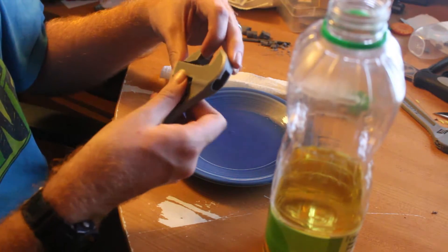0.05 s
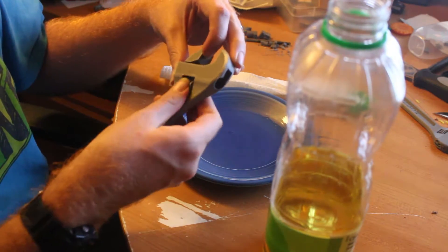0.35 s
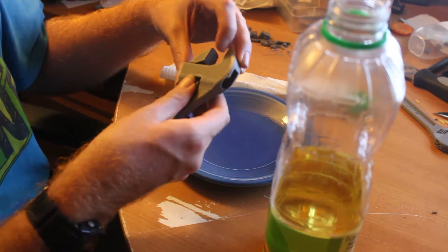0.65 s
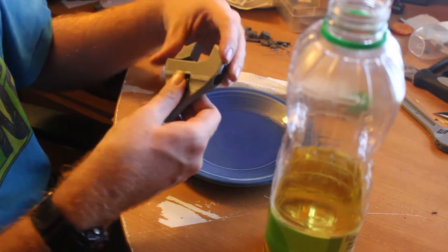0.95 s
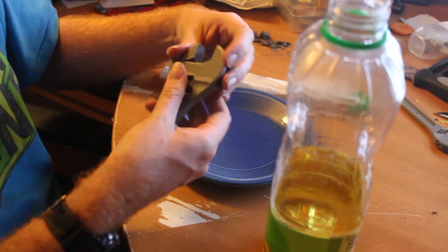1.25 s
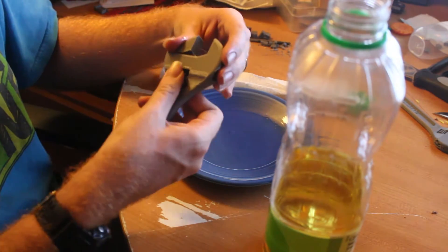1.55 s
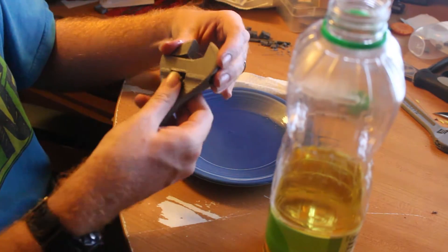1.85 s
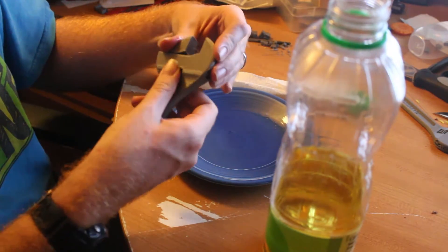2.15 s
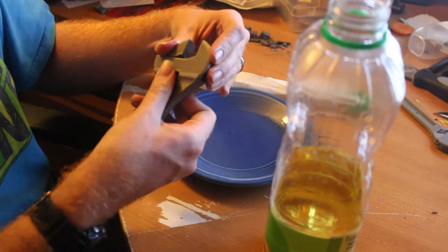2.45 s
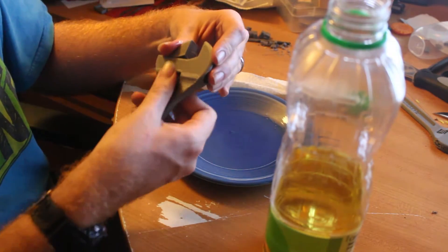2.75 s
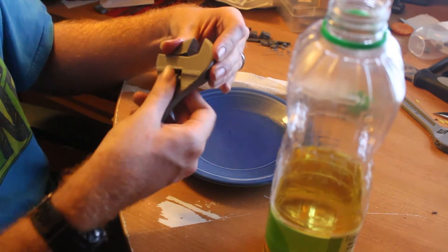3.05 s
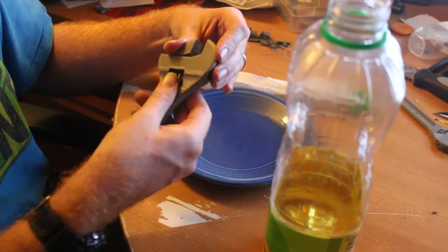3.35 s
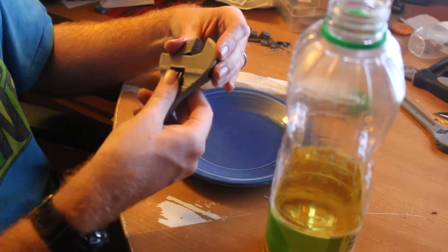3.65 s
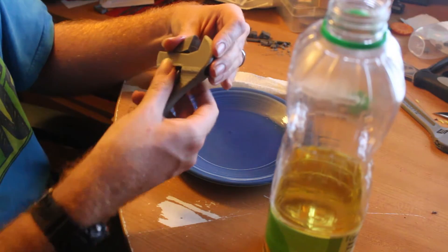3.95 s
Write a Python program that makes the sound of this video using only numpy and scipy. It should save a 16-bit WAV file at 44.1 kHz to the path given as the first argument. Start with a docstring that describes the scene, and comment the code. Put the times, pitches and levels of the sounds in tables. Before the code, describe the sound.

A small adjustable wrench clicks and rattles close by as its screw is turned. After a few faint ticks, clusters of sharp, quickly damped metal clicks come at about 1, 1.5, 2 and 2.4 seconds. They grow more frequent from 2.8 to 3.5 seconds, with a last bright cluster at 3.8. Tiny thread scrapes and faint finger rubs mix in, over soft room noise with a faint hum.

```python
"""A small adjustable wrench clicks and rattles as a thumb turns its worm screw, over a table in a quiet room.
The loose jaw knocks in its slot and the thread slips and catches; each contact force excites the modes
of the steel, which the hands damp almost at once. Fingers rub softly on the wrench head.
The table and nearby things reflect each sound, over a soft room noise with a faint hum."""
import sys
import numpy as np
from scipy import signal
from scipy.fft import rfft, irfft
from scipy.io import wavfile
from scipy.ndimage import uniform_filter1d

SR = 44100
rng = np.random.default_rng(int(sys.argv[2]) if len(sys.argv) > 2 else 0)


def waveform_to_disk(signal):
    """Save audio, clipped to [-1, 1], as 16-bit WAV at the path in sys.argv[1]."""
    frames = np.transpose(np.atleast_2d(signal))
    scaled = np.clip(frames, -1, 1) * 32767
    samples = np.round(scaled).astype(np.int16)
    wavfile.write(sys.argv[1], SR, samples)


N = 176400

# Spectral density of the room noise: frequency_hz, relative_db
NOISE_SPECTRUM = [(12, -70), (20, -7), (65, -8.5), (116, -10), (172, -4), (357, -4.5), (399, -6.5),
                  (897, -6), (976, -5), (1150, -11), (1260, -9), (3250, -16), (6010, -21), (16000, -33.5)]
# Likeness of the room noise at left and right: frequency_hz, correlation
NOISE_COHERENCE = [(60, 0.27), (180, 0.3), (550, 0.48), (1650, 0.38), (4970, -0.083), (15000, 0.015)]
# Balance of the room noise: frequency_hz, left_minus_right_db
NOISE_BALANCE = [(60, -4), (240, -6), (950, -4.5), (3770, -1), (15000, 0.5)]
# Tones of the hum: pitch_hz, level_db
HUM_TONES = [(146, -72), (182, -66.5), (726, -67)]
# Modes of the steel: frequency_hz, relative_db
STEEL_MODES = [(2170, -52), (3342, -19), (3490, 1), (3701, 2), (3821, 4), (4165, 8), (5432, 4), (6150, 5),
               (6492, 0), (7757, 5.5), (8155, 4), (10300, -15), (12800, 2)]
# Jaw resonance, shifting with the contact point, ringing on in a loose grip: time_s, pitch_hz, ring_db
JAW_RESONANCE = [(.12, 4220, -27), (.45, 4000, -44), (1.05, 4020, -48), (1.55, 3770, -44),
                 (2.02, 3720, -46), (2.26, 3760, -21), (2.44, 3680, -37), (3.16, 3800, -43),
                 (3.31, 3930, -23), (3.39, 3910, -19), (3.46, 3870, -41), (3.82, 3380, -29.5)]
# High resonance that the contact favours: time_s, pitch_hz, peak_db
HIGH_RESONANCE = [(.45, 6450, 4), (1.05, 5730, -2), (3.136, 6300, 7), (3.15, 9950, 16.5),
                  (3.45, 10250, 6.5), (3.82, 7800, 4.5)]
# Nominal centres of the four colour bands: body_hz, low_ring_hz, mid_ring_hz, treble_hz
BAND_CENTRES = [2320, 3740, 5900, 9000]
# Radiation of the small tool: frequency_hz, gain_db
RADIATION = [(300, -39), (900, -22), (1400, -9), (2000, -2), (2600, -3.5), (3300, -4.5), (4200, -8),
             (5000, -6), (6200, -4), (8000, -4), (10300, -7), (12000, -12), (16000, -18)]
# Knocks and their band gains: start_s, strength_db, body_db, low_ring_db, mid_ring_db, treble_db
KNOCKS = [(0.0436, -33, -7.5, -20, -17, -11), (0.1168, -29, -27, -2, -14.5, -11),
          (0.9422, -28.5, -12.5, -9, -16.5, -15.5), (0.9862, -39, -9, -3, -3, -10),
          (1.026, -31, -4.5, -1.5, 0.5, -4), (1.0518, -10, -28.5, -3.5, -20.5, -20),
          (1.0776, -19, -17.5, -10.5, -11, -13.5), (1.1663, -29.5, -8, -13, -11, -22),
          (1.4955, -28.5, -30, -15, -9.5, -14.5), (1.504, -39, 0.5, -2, -2, -10),
          (1.536, -10.5, -20.5, -14, -8.5, -14.5), (1.5702, -21.5, -20, -13, -12, -11.5),
          (1.5974, -23, -17, -14.5, -8, -14.5), (1.7075, -29, -24, -10, -11, -13),
          (1.7458, -27, -21.5, -17, -14, -17), (1.9441, -24.5, -27, -10.5, -13.5, -16.5),
          (2.011, -10.5, -21, -8, -11.5, -20), (2.0242, -13, -16.5, -12.5, -18, -16.5),
          (2.1943, -30.5, -23, -6.5, -15, -9.5), (2.2555, -26, -19, -7, -18.5, -10),
          (2.4021, -28, -12, -7, -21, -36), (2.413, -31, -20, 4, -22, -37),
          (2.4448, -16, -28, -8.5, -9.5, -18), (2.455, -19, -34, -7, -8, -30),
          (2.4981, -25, -16, -7, -16, -14), (2.763, -30.5, -29, -19, -15.5, -20),
          (2.7809, -14.5, -25, -15, -21.5, -25), (2.7884, -20.5, -20, -9.5, -24, -17.5),
          (2.7947, -25.5, -22, -6, -10, -18), (2.9612, -23.5, -19.5, -13, -15, -17.5),
          (3.0348, -26.5, -17.5, -14, -13, -15.5), (3.099, -23, -25, -23, -18, -23),
          (3.1155, -15, -29, -16.5, -15.5, -13), (3.1367, -19, -25, -6.5, -17, -15),
          (3.153, -22, -29, -8, -10, -13.5), (3.3172, -36.5, -6, -4.5, -19, -25.5),
          (3.3917, -38.5, -7, -4, -32, -28), (3.4533, -24.5, -13, -22, -12, -11),
          (3.4667, -17.5, -15, -6, -37, -18), (3.79, -25.5, -9, -7, -11, -4.5),
          (3.7976, -20.5, -17, -16, -8, -16), (3.8084, -23.5, -10, -8.5, -8, -2),
          (3.8208, -11, -17.5, -10.5, -4, -6.5)]
# Reflections from the table and nearby things: delay_s, gain_db
ECHOES = [(.0026, -8), (.0057, -9), (.0092, -20), (0.015, -19)]
# Reverberation time: frequency_hz, t60_s
ROOM_DECAY = [(500, 0.13), (2000, 0.33), (4000, 0.26), (8000, 0.24), (16000, 0.22)]
# Likeness of the reverberation at left and right: frequency_hz, correlation
ROOM_COHERENCE = [(1000, 0.31), (3000, 0.73), (6000, 0.36), (12000, 0.049)]
# Band gains of the thread's contacts: body_db, low_ring_db, mid_ring_db, treble_db
THREAD_COLOUR = [-2.5, 4.5, 3.5, 4]
# Slides of the thread: start_s, length_s, level_db, tilt_db_per_octave
RATTLES = [(.056, 0.058, -50.5, -5), (0.452, 0.017, -46.5, -3.5), (0.478, 0.02, -54, -3),
           (1.082, 0.033, -47.5, -5.5), (1.127, .025, -49.5, -8.5), (1.598, 0.009, -40.5, -1),
           (2.021, 0.013, -38.5, 2), (2.401, 0.028, -44, -11.5), (2.448, 0.014, -35.5, 0.5),
           (2.806, 0.016, -45.5, -2), (3.109, 0.052, -41.5, -4), (3.4497, 0.019, -40.5, -1),
           (3.471, 0.022, -39.5, -6.5), (3.794, 0.017, -48, -16)]
# Catches of the thread: start_s, strength_db
TICKS = [(1.0582, -31.5), (2.4373, -38), (2.4615, -30.5), (3.473, -29), (3.4841, -30.5), (3.4911, -32),
         (3.4968, -32.5), (3.8153, -41)]
# Fingers rubbing on the wrench head: start_s, length_s, level_db
RUBS = [(1.067, 0.058, -48), (1.106, 0.15, -57), (1.156, 0.21, -64), (2.008, 0.049, -50.5),
        (3.465, 0.046, -47)]

NOISE_DB, NOISE_PATCH_DB = -50.5, 0.84
HUM_WANDER_SHARE, HUM_WANDER_HZ = 0.0249, 12.2
KNOCK_CONTACT_S, THREAD_CONTACT_S, CONTACT_GAIN_DB = 0.0019, 0.00104, 27
MODE_WIDTH_HZ, MODE_GAIN_DB, STEEL_RING_DB, STEEL_T60_S = 140, -5.5, -35, 0.1
JAW_WIDTH_HZ, JAW_PEAK_DB, JAW_T60_S, HIGH_WIDTH_HZ = 730, 4.5, 0.087, 520
TAIL_DB, SCATTER_T60_S, ECHO_SMEAR_S, PAN_RIGHT_DB = -4, 0.059, 0.0004, 1.04
SLIPS_PER_S, SLIP_SPREAD_DB, THREAD_WET_DB = 900, 4.5, -0.5


def amp(db):
    """Amplitude ratio of a level in decibels."""
    return 10 ** (np.asarray(db) / 20)


def unit_rms(x):
    """Normalisation to a mean power of one."""
    return x / np.sqrt(np.mean(abs(x) ** 2) + 1e-20)


def unit_energy(x):
    """Normalisation of each channel to an energy of one."""
    return x / np.sqrt(np.sum(x ** 2, -1, keepdims=True) + 1e-20)


def at_frequency(points, hz):
    """Interpolation on a logarithmic frequency axis."""
    known_hz, values = np.transpose(points)
    return np.interp(np.log(hz + 1), np.log(known_hz + 1), values)


def at_time(curve, time_s):
    """Linear interpolation of every column in time."""
    times, *columns = np.transpose(curve)
    return [np.interp(time_s, times, column) for column in columns]


def add(mix, start_s, sound):
    """Superposition: a sound adds to the stereo mix from its start time."""
    part = mix[:, round(start_s * SR):][:, :sound.shape[1]]
    part += sound[:, :part.shape[1]]


def correlate(noises, correlation):
    """Partial coherence: the right channel takes a share of the left one's noise."""
    left, other = noises
    return np.array([left, correlation * left + np.sqrt(1 - correlation ** 2) * other])


def minimum_phase(spectrum_db):
    """Minimum phase: the most compact causal response with a given magnitude spectrum."""
    log_gain = np.maximum(spectrum_db, -100) * np.log(10) / 20
    mirrored = np.concatenate([log_gain, log_gain[-2:0:-1]])
    return np.fft.ifft(np.exp(signal.hilbert(mirrored).conj())).real


def room_noise():
    """Coloured, partly coherent noise whose level varies slightly over time and frequency."""
    hz = np.fft.rfftfreq(2048, 1 / SR)
    shape = (2, N // 512 + 5, len(hz))  # channels, frames, bins
    white = rng.standard_normal(shape) + 1j * rng.standard_normal(shape)
    spectra = correlate(white, at_frequency(NOISE_COHERENCE, hz))
    patches = uniform_filter1d(rng.standard_normal(shape[1:]), size=8, axis=0)
    patches = unit_rms(uniform_filter1d(patches, size=16, axis=1))
    spectra *= amp(at_frequency(NOISE_SPECTRUM, hz) + NOISE_PATCH_DB * patches)
    lean_db = at_frequency(NOISE_BALANCE, hz) / 2
    spectra *= amp([lean_db, -lean_db])[:, None]
    _, noise = signal.istft(spectra.transpose(0, 2, 1), nperseg=2048, noverlap=1536)
    return amp(NOISE_DB) * unit_rms(noise[:, :N])


def hum():
    """Frequency modulation by slow noise makes a few faint, low tones waver."""
    lowpass = np.exp(-(np.fft.rfftfreq(N, 1 / SR) / HUM_WANDER_HZ) ** 2)
    out = np.zeros(N)
    for pitch_hz, level_db in HUM_TONES:
        wander = unit_rms(irfft(lowpass * rfft(rng.standard_normal(N)), N))
        phase = 2 * np.pi * np.cumsum(pitch_hz * (1 + HUM_WANDER_SHARE * wander)) / SR
        out += amp(level_db) * unit_rms(np.sin(phase))
    return out


def contact_force(length_s):
    """Contact chatter: a brief flutter of force with a nearly flat spectrum."""
    t = np.arange(512) / SR
    window = np.exp(-(t / length_s) ** 4)
    force = rng.standard_normal(len(t))
    for _ in range(8):  # confine in time, then flatten the spectrum
        force = irfft(np.exp(1j * np.angle(rfft(force * window))))
    return unit_energy(force * window)


def gripped_steel(time_s, force, colour_db):
    """Damped modal response: the grip broadens the resonances and leaves only a faint ring."""
    hz = np.fft.rfftfreq(2048, 1 / SR)
    jaw_hz, jaw_ring_db = at_time(JAW_RESONANCE, time_s)
    high_hz, high_db = at_time(HIGH_RESONANCE, time_s)
    peaks = [(f, MODE_WIDTH_HZ, db + MODE_GAIN_DB) for f, db in STEEL_MODES]
    peaks += [(jaw_hz, JAW_WIDTH_HZ, JAW_PEAK_DB), (high_hz, HIGH_WIDTH_HZ, high_db)]
    peak_power = sum(amp(db) ** 2 / (1 + (2 * (hz - f) / width) ** 2) for f, width, db in peaks)
    centres_hz = np.array(BAND_CENTRES, float)
    centres_hz[:2] *= jaw_hz / BAND_CENTRES[1]  # the lower two bands follow the jaw
    contact_db = at_frequency(list(zip(centres_hz, colour_db)), hz)
    snap = minimum_phase(contact_db + at_frequency(RADIATION, hz) + 10 * np.log10(1 + peak_power))
    t = np.arange(SR // 8) / SR
    modes = sum(amp(db) * np.cos(2 * np.pi * f * t) for f, db in STEEL_MODES)
    ring = amp(STEEL_RING_DB) * unit_energy(amp(-60 * t / STEEL_T60_S) * modes)
    ring += amp(jaw_ring_db) * unit_energy(amp(-60 * t / JAW_T60_S) * np.cos(2 * np.pi * jaw_hz * t))
    ring[0] += 1  # passes the snap itself
    return signal.fftconvolve(signal.fftconvolve(force, snap), ring)


def jaw_knock(start_s, strength_db, colour_db):
    """Impact excitation: the loose jaw strikes its slot in one chattering contact."""
    force = contact_force(KNOCK_CONTACT_S)
    return amp(strength_db + CONTACT_GAIN_DB) * gripped_steel(start_s, force, colour_db)


def room(sound, wet_db=0):
    """Reflection: echoes, scatter from clutter and a short tail, drawn anew, follow the direct sound."""
    size = SR // 3
    t = np.arange(size) / SR
    hz, frame_s, spectra = signal.stft(rng.standard_normal((2, size)), SR, nperseg=256)
    spectra = correlate(spectra, at_frequency(ROOM_COHERENCE, hz)[:, None])
    decay = amp(-60 * frame_s / at_frequency(ROOM_DECAY, hz)[:, None])
    tail = signal.istft(spectra * decay, SR, nperseg=256)[1][:, :size]
    tail *= np.minimum(t / 0.0043, 1)
    scatter = signal.istft(spectra, SR, nperseg=256)[1][:, size - 1::-1]  # reversed: unlike the tail
    scatter *= amp(-60 * t / SCATTER_T60_S) * np.minimum(t / 0.00087, 1)
    response = amp(wet_db) * (amp(TAIL_DB) * unit_energy(tail) + unit_energy(scatter))
    response[[0, 1], [0, 1]] += 1  # the direct sound reaches the right one sample later
    for delay_s, gain_db in ECHOES:  # uneven surfaces spread each echo in time
        smear = unit_energy(rng.standard_normal(size) * np.exp(-t / ECHO_SMEAR_S))
        add(response, delay_s, amp(gain_db) * smear[None])
    return signal.fftconvolve(sound[None], response, axes=1) * amp([[-PAN_RIGHT_DB], [PAN_RIGHT_DB]])


def thread_rattle(start_s, length_s, level_db, tilt_db_per_octave):
    """Sliding as a Poisson process: the thread slips in a dense run of tiny random contacts."""
    size = round(length_s * SR)
    chance, strength, side = rng.random((3, SR // 10))[:, :size]
    slip_db = SLIP_SPREAD_DB * np.minimum(-np.log(strength), 3)
    slips = (chance < SLIPS_PER_S / SR) * np.sign(side - 0.5) * amp(slip_db)
    force = np.convolve(slips, contact_force(THREAD_CONTACT_S))
    octaves = np.log2(np.array(BAND_CENTRES) / np.mean(BAND_CENTRES))
    rattle = gripped_steel(start_s, force, THREAD_COLOUR + tilt_db_per_octave * octaves)
    return amp(level_db) * np.sqrt(size) * unit_energy(rattle)


def thread_tick(start_s, strength_db):
    """Stick-slip: the thread catches and lets go with one short, sharp tick."""
    force = contact_force(THREAD_CONTACT_S)
    colour_db = np.array(THREAD_COLOUR) - max(THREAD_COLOUR)
    return amp(strength_db + CONTACT_GAIN_DB) * gripped_steel(start_s, force, colour_db)


def finger_rub(length_s, level_db):
    """Friction noise: skin sliding on steel gives a soft band of noise that swells and fades."""
    size = round(length_s * SR)
    bandpass = signal.butter(2, [595, 2000], "bandpass", fs=SR)
    friction = unit_rms(signal.lfilter(*bandpass, rng.standard_normal(SR)))[:size]
    return amp(level_db) * np.hanning(size) * friction


def scene():
    """Superposition of fingers and wrench, with their reflections, on the room's noise and hum."""
    mix = room_noise() + hum()
    for start_s, length_s, level_db in RUBS:
        add(mix, start_s, room(finger_rub(length_s, level_db)))
    for start_s, strength_db, *colour_db in KNOCKS:
        knock = jaw_knock(start_s, strength_db, colour_db)
        add(mix, start_s + 0.0008, room(knock))  # each knock sounds 0.8 ms after its listed start
    for start_s, strength_db in TICKS:
        add(mix, start_s, room(thread_tick(start_s, strength_db), THREAD_WET_DB))
    for start_s, *slide in RATTLES:
        add(mix, start_s, room(thread_rattle(start_s, *slide), THREAD_WET_DB))
    return mix


def record(dry):
    """Band limiting: a linear-phase low-pass removes the highest treble."""
    lowpass = signal.firwin(255, cutoff=16100, window=("kaiser", 9), fs=SR)
    return signal.oaconvolve(dry, lowpass[None], "same")


dry = scene()
out = record(dry)
waveform_to_disk(out)
```